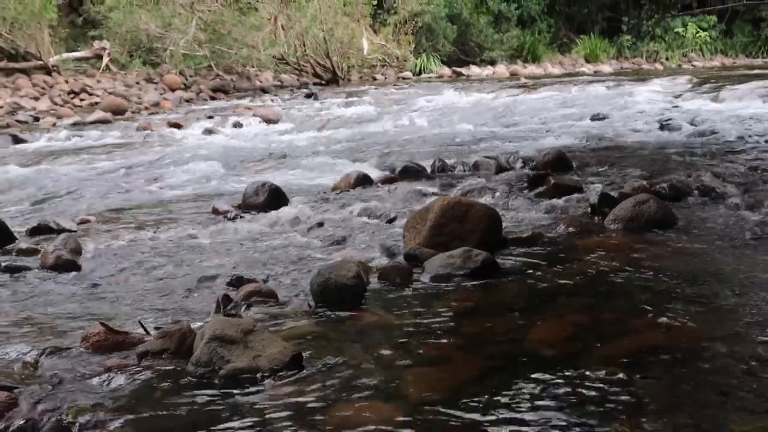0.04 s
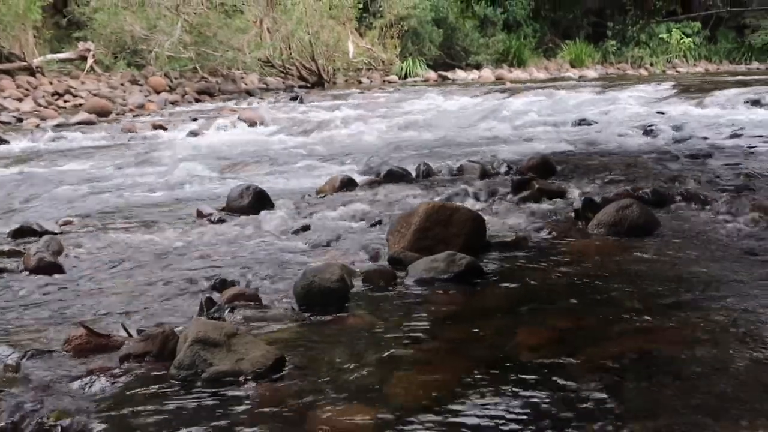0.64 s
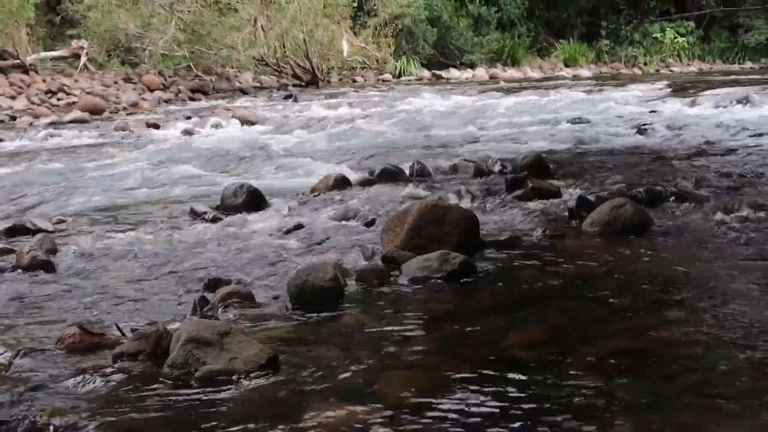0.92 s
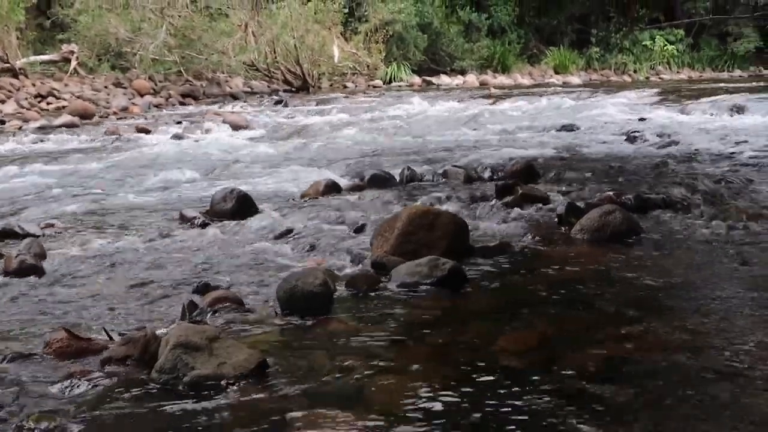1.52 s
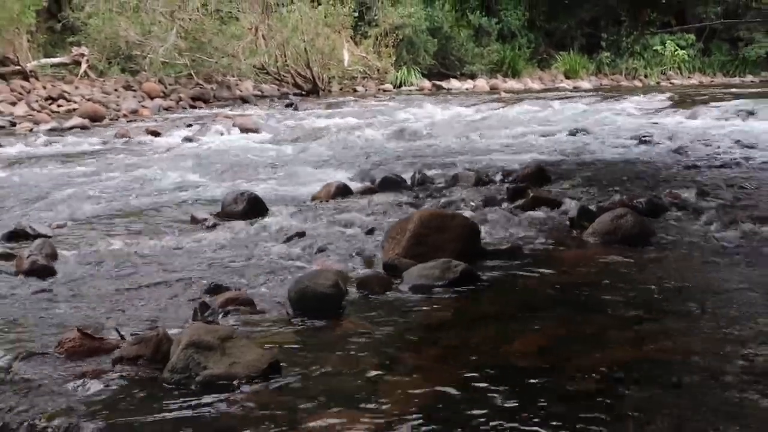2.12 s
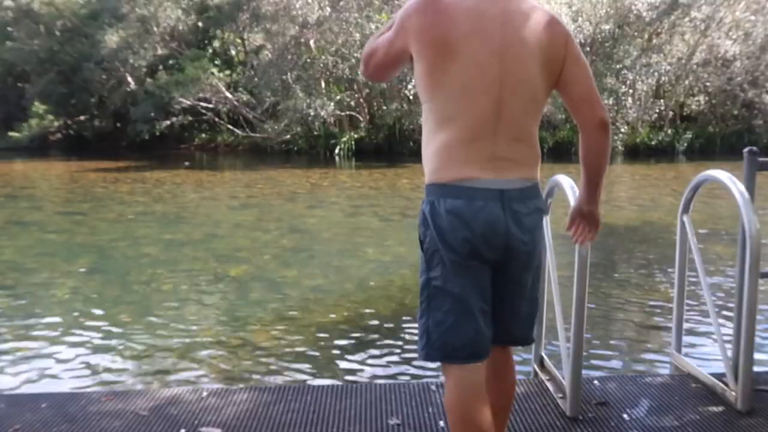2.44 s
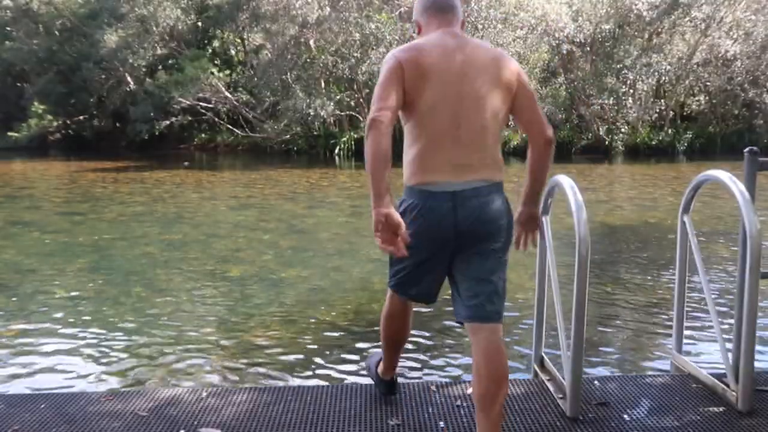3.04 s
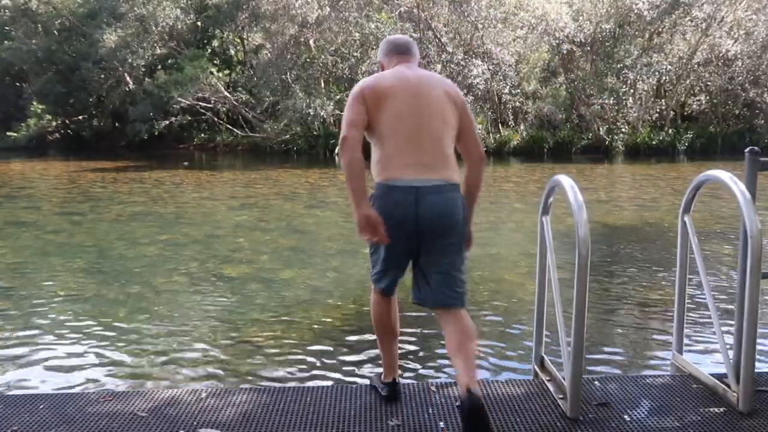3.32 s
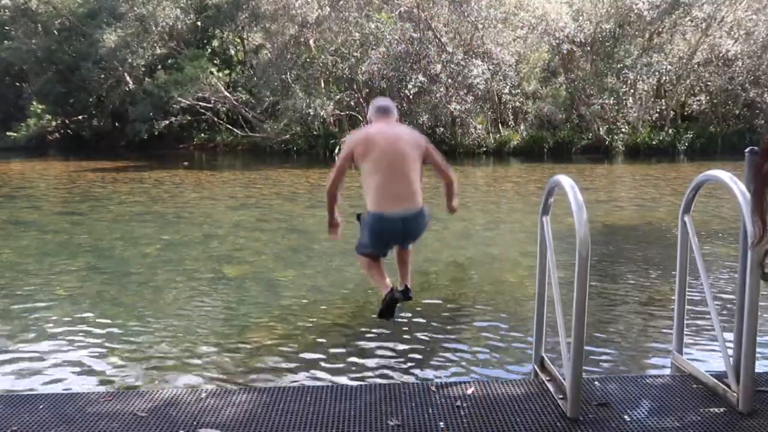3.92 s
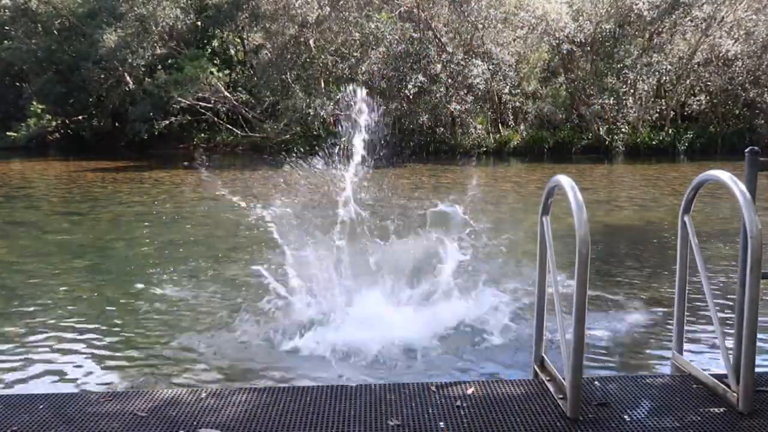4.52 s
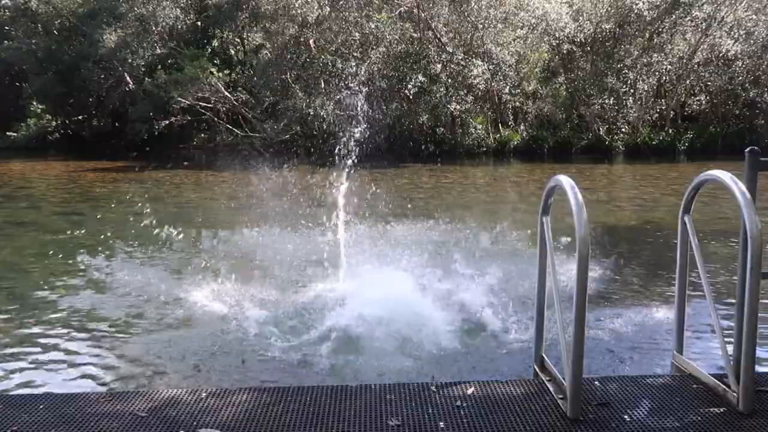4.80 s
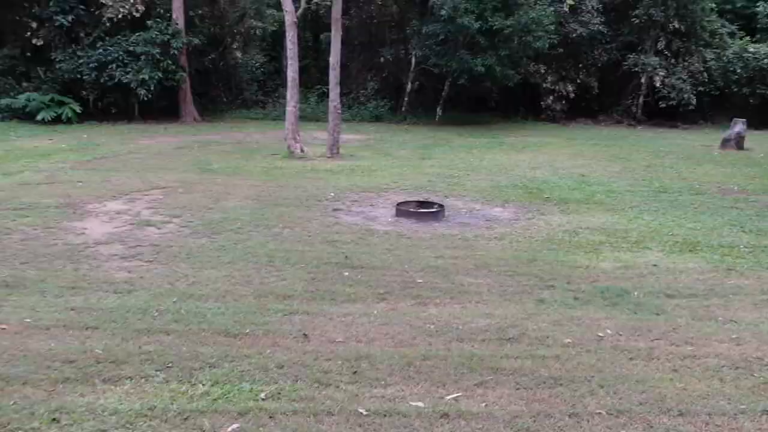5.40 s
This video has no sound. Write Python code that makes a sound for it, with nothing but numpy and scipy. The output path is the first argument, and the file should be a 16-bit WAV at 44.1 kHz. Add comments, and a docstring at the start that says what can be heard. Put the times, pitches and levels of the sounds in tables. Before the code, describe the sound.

Rushing creek water cuts to a distant wash; someone steps along a jetty and plunges in with a slap, gulps and falling drops.

```python
"""Rapids, then a jump into a pool.

Shallow rapids roar with countless ringing bubbles; then, abruptly, a calm pool with the rapids far off.
A person steps along a jetty and jumps in: the impact slaps the surface, the air cavity pinches off
in deep gulps, and thrown water rains back as drops and small bubbles, until a quiet clearing takes over.
"""
import sys
import numpy as np
from scipy.fft import rfft, irfft, next_fast_len
from scipy.io import wavfile
from scipy.ndimage import map_coordinates

SR = 44100
rng = np.random.default_rng(int(sys.argv[2]) if len(sys.argv) > 2 else 0)


def unload_audio(sound):
    """Save the sound as a 16-bit wav file, at the path given as the first command line argument."""
    columns = np.transpose(np.atleast_2d(sound))
    # keep every value between -1 and 1, then stretch to whole-number steps
    steps = np.round(np.clip(columns, -1, 1) * 32767)
    wavfile.write(sys.argv[1], SR, steps.astype(np.int16))


N = 244975

POOL_START_S, POOL_END_S = 2.354, 5.435
ENTRY_S, COLLAPSE_S = 4.176, 4.498  # the body breaks the surface; the hole behind it snaps shut

# left-right likeness of sources straight ahead: frequency_hz, coherence
AHEAD = [(100, .9995), (300, 1), (1400, .9995), (2600, 1), (3200, 0.99), (6820, 0.29), (10000, -0.41),
         (15000, -0.34)]
# spectra of an impact's crack and of the spray it tears off: frequency_hz, density_db
CRACK_SPECTRUM = [(100, -28), (400, -15), (750, 1.5), (2300, -3.5), (3500, -7.5), (5500, -14.5),
                  (8500, -25), (12000, -10), (16000, -30.5)]
TORN_SPECTRUM = [(80, -30), (250, -12), (800, 2.5), (2400, 1.5), (4000, -5), (6000, -11), (8000, -19.5),
                 (13000, -21), (16000, -33)]
# brief high ring of the first impact: pitch_hz, level_db, t60_s
CRACK_MODES = [(3100, -15.5, .018), (3380, -20, .018), (5440, -22.5, 0.029), (8400, -23.5, 0.026),
               (11250, -22, 0.03), (11700, -25, .028), (12600, -28, .024)]
# blows on the water by the body, then by the walls of its hole:
# start_s, level_db, pocket_pitch_hz, pocket_t60_s, crack_relative_db, torn_relative_db, foam_cutoff_hz
SLAPS = [(4.1704, 3.5, 1350, 0.0083, -4.5, -19.5, 20000), (4.1714, -7, 770, 0.0079, -3, -31, 20000),
         (4.1733, 0, 2330, 0.0075, -6.5, -34, 19000), (4.1805, -18.5, 2500, .012, -8, -1.5, 14000),
         (4.2465, -18, 1900, .012, -10, -16, 4500), (4.2737, -14, 1500, 0.0046, -4, -18, 20000),
         (4.2765, -8, 2010, 0.0056, -5, -19, 11000), (4.3064, 0, 1760, 0.0082, -7, -22, 6500),
         (4.3073, -6, 840, 0.012, -6, -17, 6500), (4.5057, -10, 190, .014, -20, -30, 1500)]


def slaps():
    """Impact: each blow cracks, tears off spray and rings trapped air; foam cushions the treble."""
    crack_noise = stereo(white(), CRACK_SPECTRUM, [(1000, 1.0), (3000, 0.89), (12000, 0.5)])
    torn_noise = stereo(white(), TORN_SPECTRUM, AHEAD)
    first_s = SLAPS[0][0]
    out = sum(amp(db) * damped_mode(first_s, hz, t60) for hz, db, t60 in CRACK_MODES)
    for s, db, pocket_hz, t60, crack_db, torn_db, cutoff_hz in SLAPS:
        crack = amp(crack_db) * decay(s, t60=0.0057, attack=0.00011) * crack_noise
        torn = amp(torn_db) * decay(s, t60=0.07, attack=0.00085) * torn_noise
        hiss = filtered(crack + torn, lambda hz: 1 / (1 + (hz / cutoff_hz) ** 4))
        ring = damped_mode(s, pocket_hz, t60)
        # a thin pocket radiates little far below its own pitch
        pocket = filtered(ring, lambda hz: 1j * hz / (1j * hz + .22 * pocket_hz))
        out = out + amp(db) * (hiss - pocket)
    return out


# large air pockets pinching off: start_s, level_db, pitch_hz, life_cycles
GULPS = [(4.182, -14.5, 368, 10.5), (4.272, -18.5, 152, 11), (4.312, -17.5, 273, 16),
         (4.328, -17.5, 148, 11), (4.385, -21, 104, 11), (4.425, -17, 130, 9.2), (4.447, -11, 268, 18),
         (4.485, -12, 145, 9.3), (4.499, -9, 70, 6.5), (4.526, -15, 162, 11), (4.544, -15, 500, 30),
         (4.649, -16.5, 271, 15), (4.786, -16.5, 545, 16), (5.309, -17.5, 686, 22)]


def gulps():
    """Bubble resonance: enclosed air is a spring, and the water around it a mass."""
    t = clock()
    return sum(amp(db) * bubble(np.clip((t - s) * hz / cycles, 0, 1), cycles, rise=0.22)
               for s, db, hz, cycles in GULPS)


# spectra of churning bubbles and of the deep surge beneath them: frequency_hz, density_db
CHURN_SPECTRUM = [(25, -37), (70, -22.5), (155, -4.5), (280, 3), (420, -2), (600, -7), (900, -8),
                  (2000, -40)]
SURGE_SPECTRUM = [(20, -22), (45, -14), (72, -1.5), (100, -6.5), (150, 2), (220, -13), (500, -48.5)]
# the body sinks, the walls fall in, the hole shuts: peak_s, level_db, settling_s, spray_relative_db
HEAVES = [(4.276, -29, 0.13, -2), (4.441, -29, 0.086, -5.5), (4.513, -21.5, 0.05, -8)]
FOAM_RISE_S = 0.014  # the collapse leaves a bubble cloud that wells up as foam


def cavity():
    """Cavity collapse: the hole behind the body heaves and breaks into large, short-lived bubbles."""
    heave = power_sum(amp(db) * swell(s, settle) for s, db, settle, _ in HEAVES)
    foam = decay(COLLAPSE_S, t60=4.5, attack=FOAM_RISE_S)
    glugs = bubbles(4.1, POOL_END_S, 102.4, 1536, cycles=9.3, spread_db=3, rise=.25, count=2000)
    churn_level = power_sum([amp(-2.5) * heave, amp(-32.5) * foam])
    surge_level = power_sum([heave, amp(-40.5) * foam])
    churn = stereo(glugs + white(), CHURN_SPECTRUM, AHEAD)
    surge = stereo(white(), SURGE_SPECTRUM, coherence=[(100, 1)])
    return churn_level * churn + surge_level * surge


# spectra of falling drops and of fine mist: frequency_hz, density_db
DROP_SPECTRUM = [(150, -21), (450, -0.5), (700, 1.5), (1050, -3), (1500, 1.5), (2300, -0.5), (3200, -5.5),
                 (4500, -12.5), (6300, -16.5), (8000, -32), (12000, -49)]
MIST_SPECTRUM = [(4000, -25), (7500, -0.5), (10000, -4), (13200, -4), (15000, -17)]
# the low crown of water rains back, then the tall jet and its crest: peak_s, level_db, half_width_s
SHOWERS = [(4.73, -34.5, 0.095), (5.136, -30.5, 0.21), (5.16, -32.5, 0.043)]
SPRAY_LAG_S = 0.014  # spray follows each heave


def spray():
    """Drop impact and air entrainment: falling water ticks and rings small bubbles, under a mist."""
    thrown = power_sum(amp(db + spray_db) * swell(s + SPRAY_LAG_S, settle)
                       for s, db, settle, spray_db in HEAVES)
    shower = power_sum(amp(db) * gaussian(s, half) for s, db, half in SHOWERS)
    foam = decay(COLLAPSE_S, t60=35, attack=FOAM_RISE_S)  # its small bubbles go on bursting
    entry_puff = amp(-42) * decay(ENTRY_S, t60=1.5, attack=.005)
    impacts = bubbles(4.1, POOL_END_S, 600, 12000, cycles=2.4, spread_db=2, rise=0, count=11000)
    plinks = bubbles(4.1, POOL_END_S, 400, 7070, cycles=24.4, spread_db=2.5, rise=0.29, count=8000)
    patter = stereo(impacts + plinks + white(), DROP_SPECTRUM, AHEAD)
    mist = stereo(white() * amp(1.6 * wobble(60)), MIST_SPECTRUM, AHEAD)
    patter_level = power_sum([thrown, shower, amp(-32) * foam])
    mist_level = power_sum([entry_puff, amp(-14) * shower, amp(-46) * foam])
    return patter_level * patter + mist_level * mist


# spectrum of the near rapids: frequency_hz, density_db
RAPIDS_SPECTRUM = [(30, -31), (55, -28), (100, -13), (180, -5.5), (300, -3), (470, 0.5), (700, -3.5),
                   (1000, -3.5), (1350, -9), (2400, -13.5), (4000, -20.5), (8000, -29.5), (12000, -39.5),
                   (14500, -64)]
# left-right likeness of a broad, near source: frequency_hz, coherence
NEAR_WIDE = [(40, 0.99), (150, 1), (500, 0.99), (1000, 1), (1400, 0.98), (3100, 0.78), (6000, 0.29),
             (9000, -0.49), (13000, -0.86)]


def rapids():
    """Superposition: countless bubbles merge into a roar; near ones burble, large ones gurgle."""
    end_s = POOL_START_S + .1
    burble = bubbles(0, end_s, 151.4, 6990, cycles=13.8, spread_db=1, rise=0.22, count=14000)
    gurgle = bubbles(0, end_s, 231, 1248, cycles=48, spread_db=1, rise=0.058, count=380)
    roar = white()
    water = roar + amp(-7) * burble + amp(-17.5) * gurgle
    return amp(-20.5) * leftward(stereo(water, RAPIDS_SPECTRUM, NEAR_WIDE))


# spectra of the struck jetty and of a scraping sole: frequency_hz, density_db
JETTY_SPECTRUM = [(30, -17), (80, 2), (150, -4.5), (260, -1), (550, -1.5), (900, -13), (3000, -24),
                  (9000, -56)]
SOLE_SPECTRUM = [(300, -14), (1200, -2), (2500, 6), (3600, -5), (6500, -13), (9000, -25), (14000, -26)]
# footfalls: start_s, level_db, t60_s
STEPS = [(2.902, -33, .02), (3.08, -37, 0.061), (3.218, -29.5, 0.43), (3.562, -35, 0.079),
         (3.757, -30.5, 0.24)]
# scrapes of a sole: peak_s, level_db, half_width_s
SCUFFS = [(2.93, -44, 0.005), (2.933, -41, 0.029), (3.565, -50, .01)]


def footsteps():
    """Impact and friction: soft shoes thud on the jetty and scrape its grating."""
    thuds = sum(amp(db) * decay(s, t60, attack=0.003) for s, db, t60 in STEPS)
    scrapes = sum(amp(db) * gaussian(s, half) for s, db, half in SCUFFS)
    thud_noise = stereo(white(), JETTY_SPECTRUM, AHEAD)
    scrape_noise = stereo(white(), SOLE_SPECTRUM, AHEAD)
    return thuds * thud_noise + scrapes * scrape_noise


# resonances of the steel rail: pitch_hz, relative_db, t60_s
RAIL_MODES = [(950, -4, .014), (2430, 3, 0.016), (3240, -1.5, 0.03), (6440, -19, .04)]
# spectrum of a knock's dull contact: frequency_hz, density_db
CONTACT_SPECTRUM = [(150, -8), (600, 0), (1500, -2), (2700, 0), (4200, -14), (12000, -28)]
# light knocks on the rail: start_s, level_db
KNOCKS = [(2.918, -32), (2.92, -31), (2.9252, -36)]


def ladder_rail():
    """Modal vibration: a passing hand knocks the rail, which rings at its natural frequencies."""
    ring = sum(amp(db + mode_db) * damped_mode(s, hz, t60)
               for s, db in KNOCKS for hz, mode_db, t60 in RAIL_MODES)
    contact = sum(amp(db) * decay(s, t60=0.008, attack=.0002) for s, db in KNOCKS)
    return ring + amp(-3) * contact * stereo(white(), CONTACT_SPECTRUM, AHEAD)


# spectrum of the rapids heard from the pool: frequency_hz, density_db
FAR_RAPIDS_SPECTRUM = [(25, -21), (70, -6.5), (115, -10), (260, -4), (420, -1), (620, -1), (1000, -6.5),
                       (1500, -7), (2300, -12.5), (3200, -18), (5000, -30.5), (7000, -38), (11000, -52),
                       (15000, -53)]
# left-right likeness of distant surroundings: frequency_hz, coherence
FAR_WIDE = [(80, .997), (200, 0.93), (400, 0.96), (1900, 1), (3100, .7), (4300, -0.1), (7000, 0),
            (9500, -0.69), (14000, -0.043)]


def far_rapids():
    """Attenuation with distance: at the pool the rapids are a dull, even wash."""
    return amp(-37) * leftward(stereo(white(), FAR_RAPIDS_SPECTRUM, FAR_WIDE))


# faint low tones at the pool: pitch_hz, level_db
HUM_TONES = [(54, -59.5), (81, -56)]


def hum():
    """Phase modulation: a low hum wavers slowly under the wash."""
    return sum(amp(db) * np.sin(2 * np.pi * hz * clock() + 0.55 * wobble(4)) for hz, db in HUM_TONES)


# calls of a small bird on the far bank: peak_s, level_db, pitch_hz
CHIRPS = [(3.25, -56, 4550), (3.325, -51, 4550), (3.375, -57, 4550), (3.48, -59, 4500), (3.64, -56, 4400)]


def bird():
    """Scattering: leaves blur a few faint, falling chirps."""
    calls = 0
    for s, db, hz in CHIRPS:
        t = clock() - s
        falling_tone = np.sin(2 * np.pi * hz * t * (1 - 0.57 * t))
        calls = calls + amp(db) * gaussian(s, half_width=.02) * falling_tone
    return calls * wobble(1100)


def insect():
    """Amplitude and frequency modulation: a thin whine flutters on the far bank."""
    level_db = -78.5 + 3 * wobble(70)
    pitch_hz = 13001 + 25 * wobble(50)
    return amp(level_db) * np.sin(2 * np.pi * np.cumsum(pitch_hz) / SR)


# spectrum of almost still air: frequency_hz, density_db
HUSH_SPECTRUM = [(30, 0), (100, -4), (750, -3), (3800, -15), (14000, -24)]
CRICKET_HZ = 6340


def clearing():
    """Ambient noise: a broadband hush, with the narrow band of one far cricket."""
    cricket = amp(-96) * wobble(200) * np.sin(2 * np.pi * CRICKET_HZ * clock())
    return amp(-83) * stereo(white(), HUSH_SPECTRUM, FAR_WIDE) + cricket


def bubble(age, cycles, rise):
    """Damped oscillation over a bubble's life (age 0-1); its pitch climbs as it nears the surface."""
    turns = cycles * age
    envelope = (1 - np.exp(-2 * turns)) * 100. ** -age * (1 - age ** 4)
    return envelope * np.sin(2 * np.pi * turns * (1 + rise * age / 2))


def bubbles(start_s, end_s, low_hz, high_hz, cycles, spread_db, rise, count):
    """Random superposition: two swarms of bubbles of varied pitch, life and size, rms 1 while active."""
    when, pitch, life, size, side = rng.random((count, 5)).T
    hz = (np.sqrt(low_hz) + pitch * (np.sqrt(high_hz) - np.sqrt(low_hz))) ** 2
    turns = np.clip(cycles, 1, 40) * (.5 + life)
    gain = hz ** .75 * amp(-spread_db * np.log(size + .01))  # the exponent keeps the spectrum flat
    length = (turns / hz * SR).astype(int) + 1
    owner = np.repeat(np.arange(count), length)  # the bubble each sample belongs to
    step = np.arange(len(owner)) - (np.cumsum(length) - length)[owner]
    wave = gain[owner] * bubble(step / length[owner], turns[owner], rise)
    onset = ((start_s + when * (end_s - start_s)) * SR).astype(int) + 2 * N * (side > .5)
    swarms = np.bincount(onset[owner] + step, wave, 4 * N).reshape(2, -1)[:, :N]
    return unit_rms(swarms) * np.sqrt((end_s - start_s) / (N / SR))


def damped_mode(s, hz, t60):
    """Free vibration of one resonance struck at time s."""
    return decay(s, t60, attack=.0001) * np.sin(2 * np.pi * hz * (clock() - s))


# excess of the left channel over the right: frequency_hz, difference_db
LEFT_BIAS = [(200, 0.5), (700, 1), (1300, 1.5), (2400, 1.5), (8000, .5), (14000, -0.5)]


def leftward(x):
    """Time and level differences: sound from the left arrives there earlier and louder."""
    lead_s = 13e-6
    half = np.array([[.5], [-.5]])
    return filtered(x, lambda hz: amp(half * curve(LEFT_BIAS, hz))
                    * np.exp(2j * np.pi * hz * half * lead_s))


def stereo(pair, spectrum, coherence):
    """Partial coherence: two unrelated textures, coloured and mixed as mid and side, rms 1."""
    def response(hz):
        angle = np.arccos(np.clip(curve(coherence, hz), -1, 1)) / 2
        side_gain = np.tan(np.minimum(angle, np.pi / 2.5))
        return amp(curve(spectrum, hz)) * np.array([np.ones_like(hz), side_gain])
    mid, side = filtered(pair, response)
    return unit_rms(np.array([mid + side, mid - side]))


def decay(s, t60, attack):
    """Exponential decay from time s, by 60 dB in t60 seconds."""
    t = np.maximum(clock() - s, 0)
    return amp(np.maximum(-60 * t / t60, -200)) * (1 - np.exp(-t / attack))


def swell(s, settle):
    """Gaussian build-up to time s, then exponential settling."""
    t = clock() - s
    rise_s = 0.49 * settle
    return np.exp(-(np.minimum(t, 0) / rise_s) ** 2 - np.maximum(t, 0) / settle)


def gaussian(s, half_width):
    """A bell-shaped envelope centred on time s."""
    return np.exp(-((clock() - s) / half_width) ** 2)


def after(s, fade):
    """A gate that opens around time s."""
    return np.clip((clock() - s) / fade + .5, 0, 1)


def power_sum(envelopes):
    """Incoherent sounds add in power."""
    return np.sqrt(sum(e ** 2 for e in envelopes))


def filtered(x, response):
    """Linear filtering: the spectrum of x times a response of frequency."""
    size = next_fast_len(N + 8192)
    return irfft(rfft(x, size) * response(np.fft.rfftfreq(size, 1 / SR)), size)[..., :N]


def white():
    """Two uncorrelated white noises."""
    return rng.standard_normal((2, N))


def wobble(rate):
    """A smooth random curve, rate knots a second."""
    return map_coordinates(rng.standard_normal(size=2048), [clock() * rate], mode="mirror")


def curve(points, hz):
    """Interpolate (frequency_hz, value) points on a log axis."""
    knots_hz, values = np.transpose(points)
    return np.interp(np.log(hz + 1), np.log(knots_hz + 1), values)


def amp(db):
    """Decibels to gain."""
    return 10 ** (np.asarray(db) / 20)


def unit_rms(x):
    """Scale to rms 1."""
    return x / np.sqrt(np.mean(x ** 2) + 1e-20)


def clock():
    """The time of every sample, in seconds."""
    return np.arange(N) / SR


def scene():
    """Short crossfades join three places: the rapids, the pool and the clearing."""
    splash = slaps() + (cavity() + gulps() + spray()) * after(ENTRY_S, fade=.008)
    pool = far_rapids() + hum() + insect() + bird() + footsteps() + ladder_rail() + splash
    at_pool = after(POOL_START_S + 0.0059, fade=0.015)
    at_clearing = after(POOL_END_S + 0.0066, fade=0.015)
    waterside = rapids() * (1 - at_pool) + pool * at_pool
    return waterside * (1 - at_clearing) + clearing() * at_clearing


def record(dry):
    """Saturation and band limiting: the hardest slap overloads the input; the top treble is cut."""
    band_limit_hz = 15300
    clipped = dry / (1 + np.abs(dry) ** 8) ** (1 / 8)
    return filtered(clipped, lambda hz: 1 / np.sqrt(1 + (hz / band_limit_hz) ** 80))


dry = scene()
out = record(dry)
unload_audio(out)
```